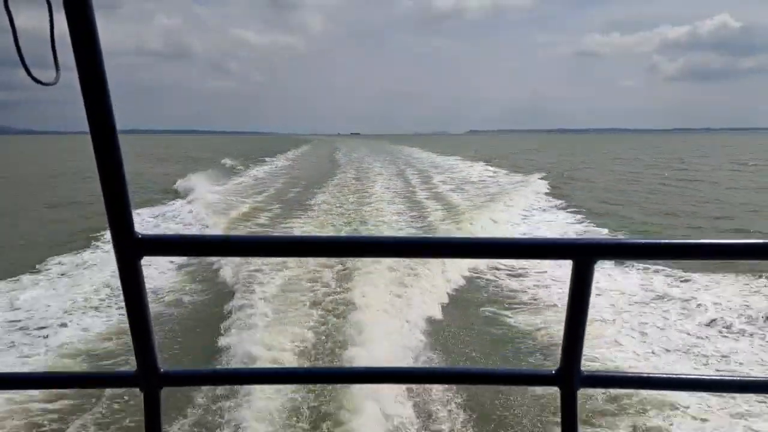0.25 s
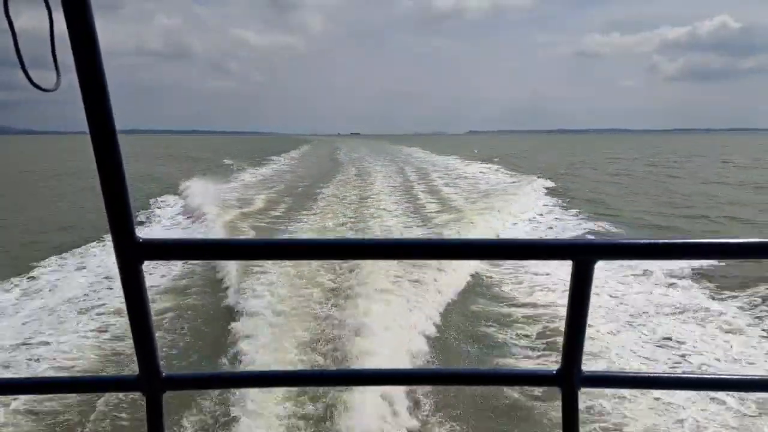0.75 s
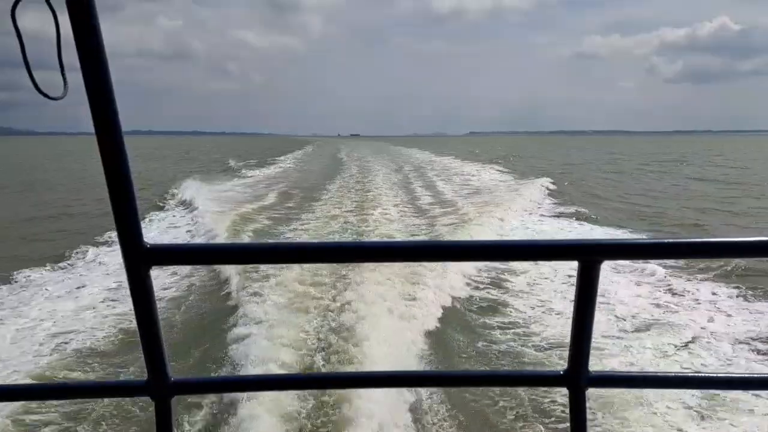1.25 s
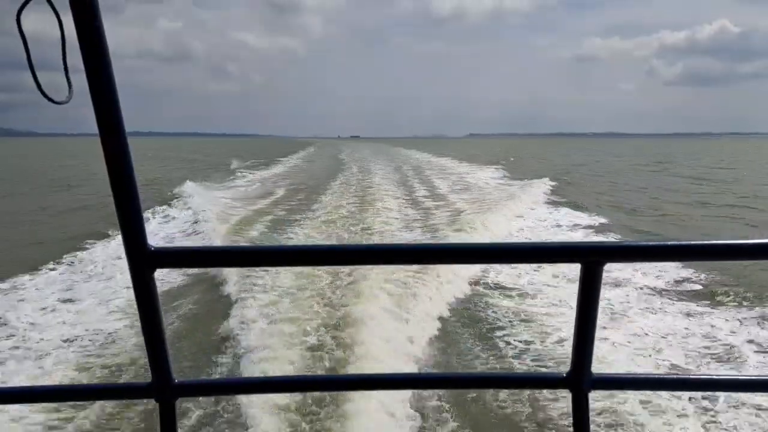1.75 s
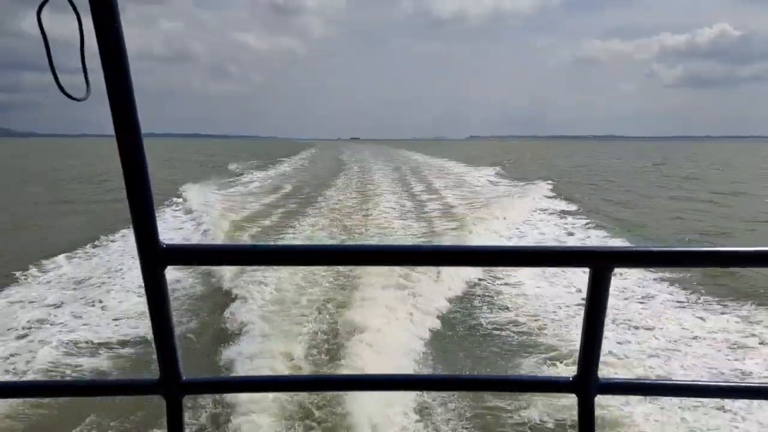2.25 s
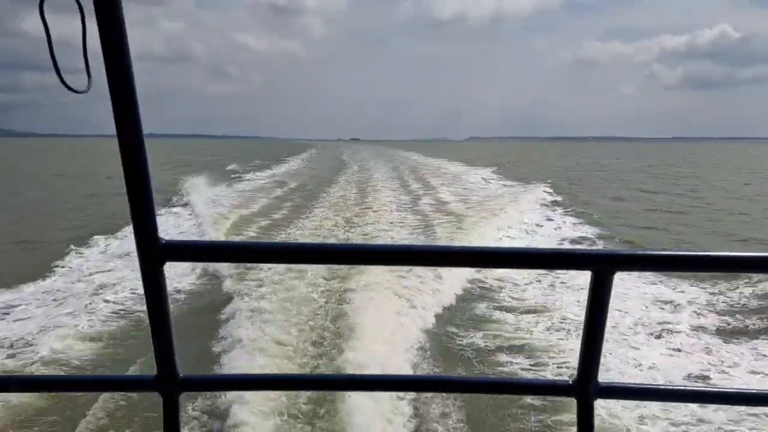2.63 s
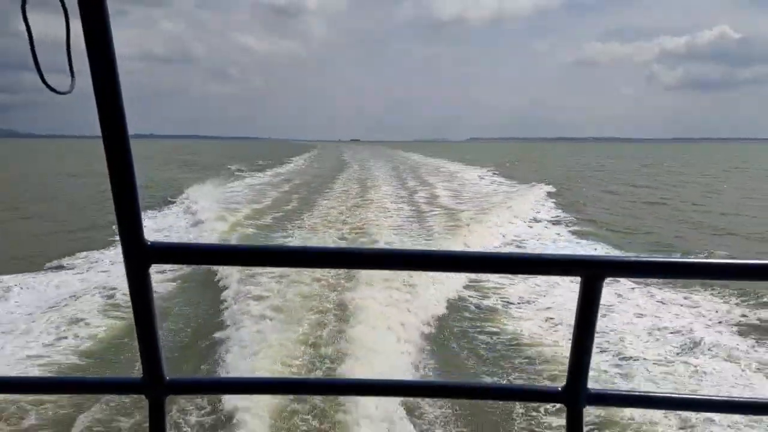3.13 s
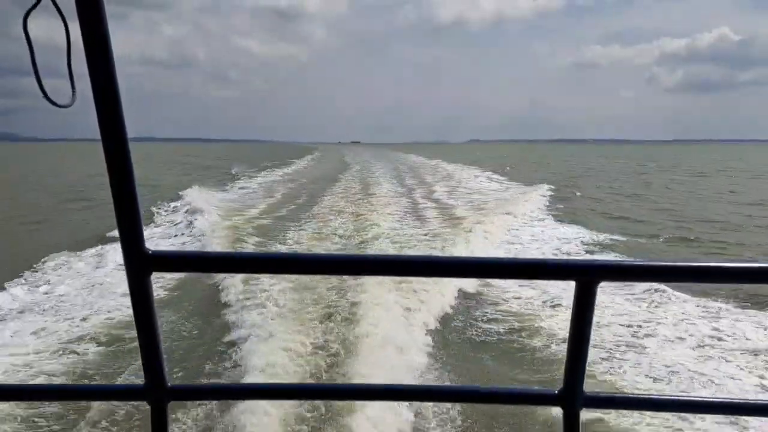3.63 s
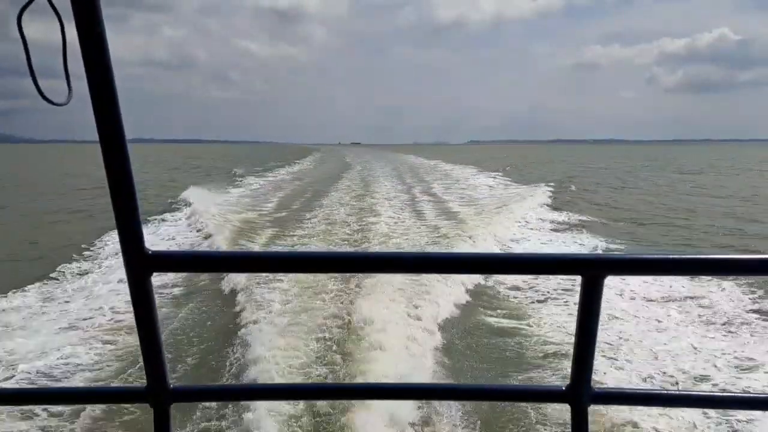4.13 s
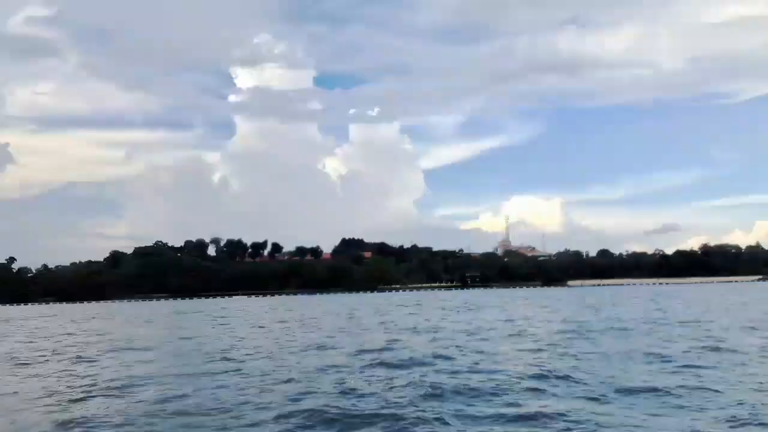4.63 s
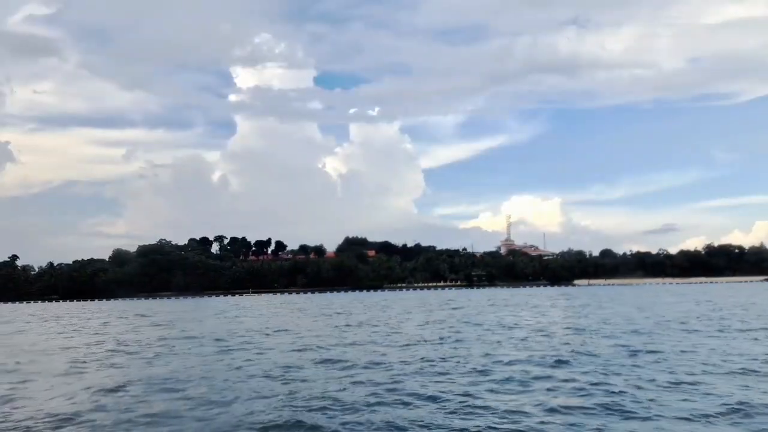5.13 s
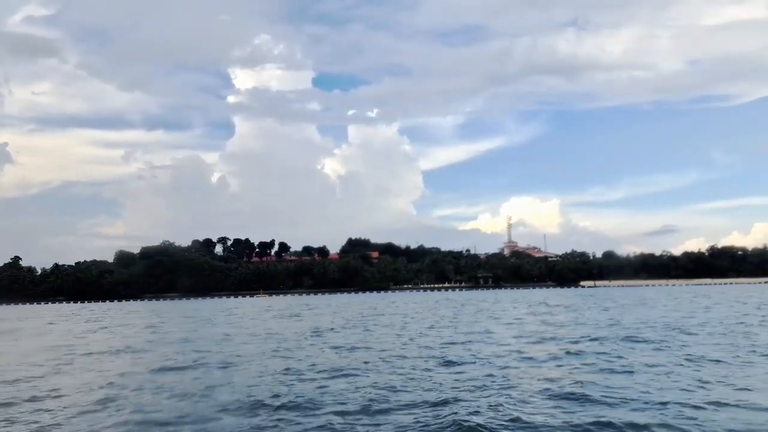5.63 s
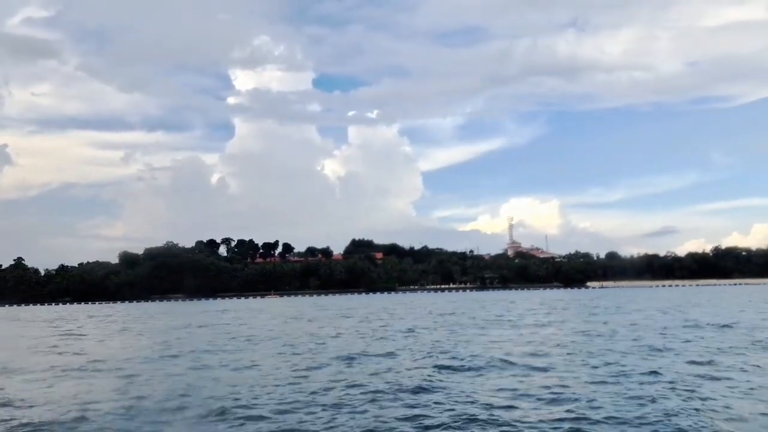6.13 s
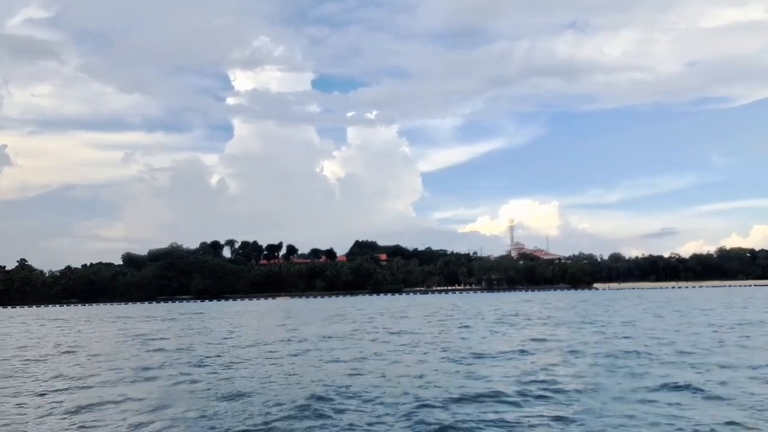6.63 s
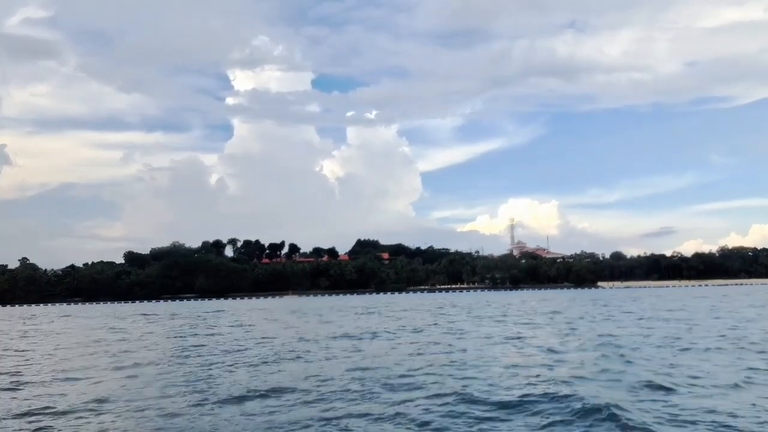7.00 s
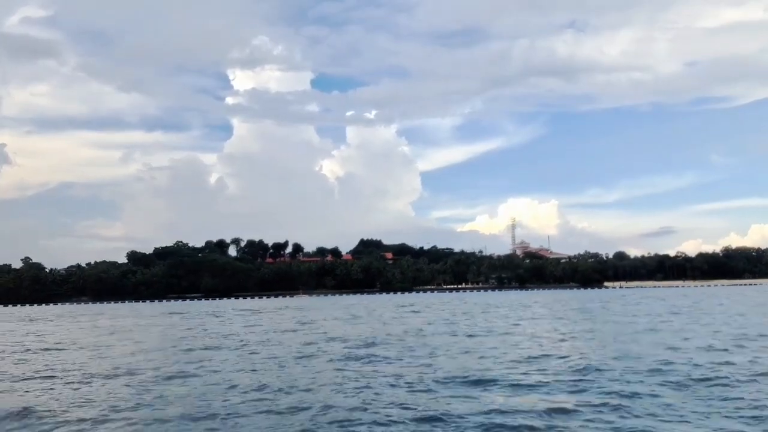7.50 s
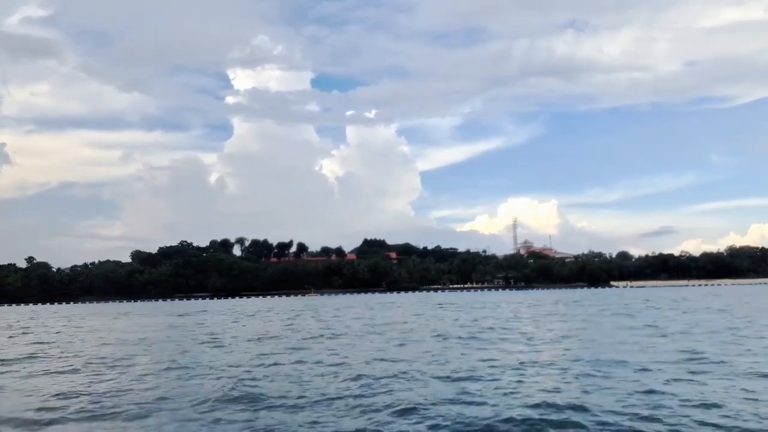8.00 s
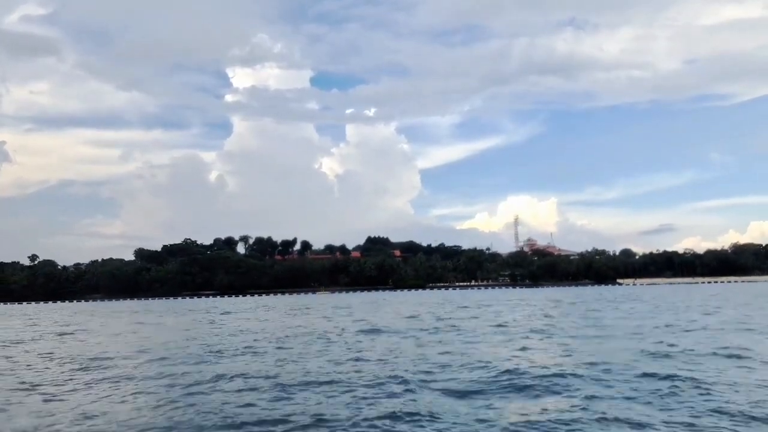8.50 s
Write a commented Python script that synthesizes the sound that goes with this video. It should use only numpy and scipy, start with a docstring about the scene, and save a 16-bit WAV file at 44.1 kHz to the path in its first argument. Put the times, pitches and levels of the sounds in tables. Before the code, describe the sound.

A loud, throbbing ferry engine drone with churning water cuts out briefly, followed by a slower low drone and soft splashes.

```python
"""First you hear the throbbing drone of a fast ferry at full speed, from the open deck at its stern.
Five diesels run at slightly different speeds, so their exhaust notes beat against each other over a
deep rumble, the roar of the wake and a faint turbocharger whistle. After a short silence comes a second
scene, along the side at slow speed: two diesels and a generator drone, gears whine, water washes past,
and small waves slap and fizz on the hull. Engines are sums of sine waves; water is shaped noise."""
import sys
import numpy as np
from scipy import signal
from scipy.fft import rfft, irfft, next_fast_len
from scipy.io import wavfile
from scipy.ndimage import uniform_filter1d, map_coordinates

SR = 44100
rng = np.random.default_rng(int(sys.argv[2]) if len(sys.argv) > 2 else 0)


def digitize_waveform(pressure):
    """Quantize a signal to 16-bit integers and store it at the path in sys.argv[1].

    Rows of a 2-D input are taken as channels; values are limited to [-1, 1].
    """
    field = np.atleast_2d(pressure).T
    bounded = np.clip(field, -1, 1)
    quanta = np.round(bounded * 32767).astype(np.int16)
    wavfile.write(sys.argv[1], SR, quanta)


N = 385875
TIME = np.arange(N) / SR
FAST_END_S, SLOW_START_S = 4.6013, 4.808  # silence lies between the two


def amp(db):
    """Turns decibels into a number to multiply by."""
    return 10 ** (np.asarray(db) / 20)

def curve_at(points, hz):
    """Joins (f/Hz, value) points with lines on a log frequency axis."""
    f, values = np.transpose(points)
    return np.interp(np.log(hz + 1), np.log(f + 1), values)

def wobble(t, rate):
    """A smooth curve through `rate` random values a second."""
    knots = rng.standard_normal(int(N / SR * 60))
    coarse = TIME[::64]
    return np.interp(t, coarse, map_coordinates(knots, [coarse * rate]))

def pulse(t, start, rise, hold, fall):
    """Climbs from 0 to 1, holds and falls back; times in seconds."""
    return np.interp(t - start, np.cumsum([0, rise, hold, fall]), [0, 1, 1, 0])


# How alike the noise is in both ears: f/Hz, likeness (1 = same, 0 = unrelated)
LIKENESS = [(60, .975), (250, .95), (500, .72), (800, .4), (1100, -.25), (1750, -.38), (2300, .3),
            (3200, 0), (15000, 0)]
# Which ear gets more noise, at the stern and at the side: f/Hz, left minus right/dB
STERN_BALANCE = [(60, 8), (99, 6), (160, 4.5), (270, -0.5), (450, -1), (740, -1.5), (1220, -3),
                 (2010, -6.5), (3330, -6), (5500, -14), (9080, -10.5), (15000, 2.5)]
SIDE_BALANCE = [(60, 11), (99, 2), (160, -2.5), (270, -1.5), (450, 4.5), (740, 1), (1220, -0.5),
                (2010, -6.0), (3330, -10.5), (5500, -7.5), (9080, 1), (15000, 0)]

def rush(t, spectrum, balance, band_hz, patchy_db):
    """Flickering stereo noise; the average of both ears has rms 1 inside band_hz."""
    cells = signal.stft(rng.standard_normal((2, len(t))), nperseg=512)[2]
    patches = uniform_filter1d(rng.standard_normal(cells.shape[1:]), size=8, axis=0)
    patches = uniform_filter1d(patches, size=10, axis=1)  # now smooth in pitch and time
    patches /= np.sqrt(np.mean(patches ** 2))
    noise = signal.istft(cells * amp(patchy_db * patches), nperseg=512)[1][:, :len(t)]
    size = next_fast_len(len(t))
    hz = np.fft.rfftfreq(size, 1 / SR)
    width = np.tan(np.arccos(curve_at(LIKENESS, hz)) / 2)
    shared, opposed = rfft(noise, size) * amp(curve_at(spectrum, hz))
    ears = np.array([shared + width * opposed, shared - width * opposed])
    ears *= amp(curve_at(balance, hz) * [[.5], [-.5]])
    band = ears.mean(axis=0)[(hz > band_hz[0]) & (hz < band_hz[1])]
    return irfft(ears, size)[:, :len(t)] * size / np.sqrt(2 * np.sum(np.abs(band) ** 2))


# When a thin sizzle comes and goes: middle t/s, half length/s, level/dB
SIZZLES = [(5.6, .06, -78), (7.48, .1, -76), (7.98, .11, -76)]
# Its tone colour: f/Hz, relative level/dB
SIZZLE_SPECTRUM = [(9500, -60), (10000, -6), (10250, 0), (10700, -6), (11200, -60)]

def sizzle(t):
    """A narrow hiss, high in the treble, appears in short spells."""
    spells = sum(amp(db) * np.exp(-((t - middle) / half) ** 4) for middle, half, db in SIZZLES)
    flicker = amp(2.5 * wobble(t, 40))
    return spells * flicker * rush(t, SIZZLE_SPECTRUM, SIDE_BALANCE, (9900, 10700), patchy_db=3)


# Small waves hitting the hull: start t/s, level/dB, time to fade by 60 dB/s
WAVES = [(4.93, -69.5, .5), (5.31, -72, .3), (5.89, -76, .2), (6.22, -73.5, .3), (6.43, -74, .2),
         (6.49, -73, .3), (6.96, -68.5, .6), (7.03, -70, .2), (7.17, -66, .15), (7.69, -76, .3),
         (7.95, -75, .3), (8.33, -66.5, .6), (8.615, -64, .2)]
# The tone colour of their fizz: f/Hz, relative level/dB
FIZZ_SPECTRUM = [(2500, -40), (4500, -10), (7000, -4), (9000, -1), (12000, 0), (14000, -3), (15700, -5)]

def small_waves(t):
    """Each wave breaks into bright fizz that rises quickly and dies away."""
    splashes = np.zeros(len(t))
    for start, db, fade_s in WAVES:
        age = np.maximum(t - start, 0)
        rise = 1 - np.exp(-age / (.03 * fade_s))
        splashes += rise * amp(db - 60 * age / fade_s)
    flicker = amp(3 * wobble(t, 40))
    return splashes * flicker * rush(t, FIZZ_SPECTRUM, SIDE_BALANCE, (11000, 15000), patchy_db=2.5)


# Turbocharger and gear tones: f/Hz, level/dB, pitch wander/Hz, left minus right/dB
TURBO_TONES = [(7895, -69, 10, -2)]
GEAR_TONES = [(462, -46, 5, -2), (710, -57, 4, 0), (740, -59, 4, 0), (775, -58, 4, 0), (984, -55.5, 5, -2),
              (1060, -64, 25, -2), (1270, -63, 25, -2), (1400, -66, 20, -2), (1550, -65, 9, -2),
              (4625, -77, 16, -4), (5185, -74.5, 8, -4)]

def whines(t, tones):
    """Spinning machinery sings tones that waver in pitch and level, differently in each ear."""
    out = np.zeros((2, len(t)))
    for hz, db, wander_hz, balance_db in tones:
        for ear, ear_db in enumerate((balance_db / 2, -balance_db / 2)):
            angle = 2 * np.pi * np.cumsum(hz + wander_hz * wobble(t, 20)) / SR
            out[ear] += 2 * amp(db + ear_db + 2 * wobble(t, 4)) * np.sin(angle)
    return out


# The tone colour of water along the hull: f/Hz, relative level/dB
WASH_SPECTRUM = [(300, -30.5), (450, -6), (600, -15), (750, -14), (870, -16.5), (1020, -19), (1150, -23.5),
                 (1300, -25), (2300, -27), (2800, -34), (3400, -39.5), (4000, -39.5), (5100, -35),
                 (5500, -40), (6500, -44), (8000, -42.5), (9300, -51), (11500, -51.5), (13000, -57.5),
                 (15700, -62.5)]

def wash(t, boost_db):
    """Water slides along the hull with a soft, fluttering hiss."""
    level_db = -52 + boost_db + 1.4 * wobble(t, 50)
    return amp(level_db) * rush(t, WASH_SPECTRUM, SIDE_BALANCE, (1090, 4000), patchy_db=1.1)


# The tone colour of the wake: f/Hz, relative level/dB
WAKE_SPECTRUM = [(200, -56), (450, -4), (600, -6), (950, -4), (1100, -9.5), (1540, -14), (2000, -13.5),
                 (2550, -11), (2850, -15.5), (4000, -18), (5800, -21.5), (8000, -26), (9400, -33),
                 (12200, -24), (14500, -33.5), (15700, -37.5)]

def wake(t, boost_db):
    """Churning water behind the ferry makes a broad roar."""
    level_db = -40.5 + boost_db + .5 * wobble(t, 14)
    return amp(level_db) * rush(t, WAKE_SPECTRUM, STERN_BALANCE, (1500, 7000), patchy_db=.72)


# The tone colour of the rumble at the stern: f/Hz, relative level/dB
STERN_RUMBLE = [(15, -43), (28, -29), (45, 3.5), (70, 0.5), (100, 1.5), (150, 0.5), (200, -7), (300, -6.5),
                (450, -12.5), (700, -23.5), (1200, -56), (2500, -120)]

def stern_rumble(t, boost_db):
    """The hull rumbles deeply and unevenly at full speed."""
    level_db = -30.5 + boost_db + .97 * wobble(t, 12)
    return amp(level_db) * rush(t, STERN_RUMBLE, STERN_BALANCE, (197, 424), patchy_db=1)


# The tone colour of the rumble at the side: f/Hz, relative level/dB
SIDE_RUMBLE = [(15, -46), (30, -12.5), (50, 6.5), (100, 9.5), (160, 8.5), (210, -6.5), (350, -4.5),
               (400, -14.5), (700, -21.5), (1200, -57), (2500, -120)]

def side_rumble(t, boost_db):
    """The hull rumbles more steadily at slow speed."""
    level_db = -35 + boost_db + .45 * wobble(t, 12)
    return amp(level_db) * rush(t, SIDE_RUMBLE, SIDE_BALANCE, (198, 450), patchy_db=1.5)


def diesel(t, cycles, notes, drift_cycles, flutter_db, strain=0):
    """Exhaust puffs make notes at multiples of the firing rate; strain weakens high ones most."""
    step = 8  # low notes only need every 8th sample
    coarse = t[::step]
    strain = np.broadcast_to(strain, t.shape)[::step]
    drift = drift_cycles * (wobble(coarse, 1.5) + .4 * wobble(coarse, 12))  # the crank turns unevenly
    right = 2 * np.pi * (cycles[::step] + drift)
    left = np.interp(coarse - 8 / SR, coarse, right)  # the drone arrives 8 samples later
    out = np.zeros((2, len(coarse)))
    for multiple, db, balance_db in notes:
        level_db = db + flutter_db * wobble(coarse, 4) - 1.6 * strain * min(multiple, 7)
        pipe_phase = .35 * multiple ** 2  # the pipe delays each note by its own amount
        note = np.sqrt(2) * np.cos(multiple * np.array([left, right]) + pipe_phase)
        out += amp([[balance_db / 2], [-balance_db / 2]]) * amp(level_db) * note
    return signal.resample_poly(out, step, 1, axis=1, padtype="line")[:, :len(t)]


# The generator's notes: multiple of the firing rate, level/dB, left minus right/dB
GENERATOR_NOTES = [(2, -23, 1), (3, -20.5, 1), (4, -42, 3), (5, -41, -2), (6, -35.5, 3), (7, -35.5, -7),
                   (8, -52, 2), (10, -50, 5), (13, -53, 8), (19, -61, 1)]

def generator(t):
    """A small diesel hums; a brief load slows it a little and dulls its sound."""
    firing_hz, sag_hz = 52.04, .96
    load = pulse(t, start=6.92, rise=.15, hold=.256, fall=.46)
    cycles = .4 + np.cumsum(firing_hz - sag_hz * load) / SR
    return diesel(t, cycles, GENERATOR_NOTES, drift_cycles=.02, flutter_db=1.4, strain=load)


# Exhaust notes, one table an engine: multiple of the firing rate, level/dB, left minus right/dB
FAST_A = [(3, -33, 1), (6, -21, 0), (8, -39, 2), (9, -29, 3), (11, -35, 3), (14, -44, 0), (15, -46, 3),
          (17, -44, 0), (18, -43, -1), (28, -46, -2)]
FAST_B = [(2, -43, 2), (3, -31, 1), (4, -38, 1), (5, -36, 2), (6, -32, 1), (7, -31, 1)]
FAST_C = [(2, -43, 2), (4, -34, 1), (5, -32, 2), (9, -36, 1), (10, -36, 1), (11, -39, 2), (12, -40, 3)]
FAST_D = [(6, -21.5, 0), (7, -35, 0), (9, -23, 1), (10, -38, 1), (11, -38, 1), (12, -43, 3), (13, -46, 2),
          (15, -46, 1)]
FAST_E = [(3, -28, 1), (4, -36, 1), (5, -39, 1), (6, -26, -2), (8, -35, 3), (9, -25, 1), (12, -44, 2),
          (18, -45, 1)]
SLOW_A = [(4, -39, 0), (5, -40, 2), (6, -18, 2), (9, -26.5, 1), (10, -33, 1), (12, -26.5, 1), (13, -37, 3),
          (14, -28.5, 1), (16, -35, 1), (17, -41, 3), (18, -35, 0), (19, -42, 1), (20, -47, 1),
          (21, -44, 2)]
SLOW_B = [(3, -34, 1), (6, -23, 1), (7, -38, 1), (9, -27, 2), (11, -37, -1), (17, -46, 3), (21, -46, -3),
          (24, -49, -6), (28, -48, 0)]
# Each engine's firing rate (full cycles a second): f/Hz
FAST_RATES = [13.588, 15.13, 15.265, 15.365, 15.5]
SLOW_RATES = [10.82, 12.267]
# A moment when each engine fires its first cylinder: t/s
FAST_FIRINGS = [2.12, 2.1448, 2.11, 2.11, 2.1313]
SLOW_FIRINGS = [6.3, 6.3259]

def main_engines(t, tables, rates, firings, flutter_db):
    """Diesels at slightly different speeds slip in and out of step, so their sum throbs."""
    return sum(diesel(t, hz * (t - fired), notes, drift_cycles=.003, flutter_db=flutter_db)
               for notes, hz, fired in zip(tables, rates, firings))


# Surges of churning water: middle t/s, half length/s, rumble change/dB, wake change/dB
WATER_SURGES = [(.5, 0.18, -2, 0.83), (1.95, 0.65, 1.5, 1.4), (3.3, 0.33, 3, 0.84)]

def full_speed(t):
    """At the stern: five engines, rumble and wake shift in level as the water surges."""
    surge_db, froth_db = sum(np.outer(changes, np.exp(-((t - middle) / half) ** 2))
                             for middle, half, *changes in WATER_SURGES)
    tables = FAST_A, FAST_B, FAST_C, FAST_D, FAST_E
    exhaust = main_engines(t, tables, FAST_RATES, FAST_FIRINGS, flutter_db=.9)
    weak_start_db = -.5 * np.clip(1 - t, 0, 1)
    exhaust *= amp(weak_start_db + .46 * surge_db)  # swings less than the rumble
    return exhaust + whines(t, TURBO_TONES) + stern_rumble(t, surge_db) + wake(t, froth_db)

def slow_speed(t):
    """At the side: machines, rumble and wash swell briefly, then small waves break."""
    swell = pulse(t, start=4.785, rise=.11, hold=.1, fall=.2)
    creep_db = .51 * (t - SLOW_START_S)  # rumble and wash slowly grow louder
    exhaust = main_engines(t, (SLOW_A, SLOW_B), SLOW_RATES, SLOW_FIRINGS, flutter_db=.8)
    drone = exhaust + generator(t)
    background = side_rumble(t, creep_db + 5 * swell) + wash(t, creep_db + 5.5 * swell)
    machines = amp(5 * swell) * (drone + whines(t, GEAR_TONES))
    return background + machines + small_waves(t) + sizzle(t)

def scene():
    """Full speed stops abruptly; after a silence, slow speed fades in quickly."""
    out = np.zeros((2, N))
    fast, slow = TIME < FAST_END_S, TIME > SLOW_START_S
    fade_out = np.clip((FAST_END_S - TIME[fast]) / .0003, 0, 1)
    fade_in = np.clip((TIME[slow] - SLOW_START_S) / .016, 0, 1) ** 1.3
    out[:, fast] = full_speed(TIME[fast]) * fade_out
    out[:, slow] = slow_speed(TIME[slow]) * fade_in
    return out

def record(dry):
    """Gently squeezes the loudest peaks and removes the very highest treble."""
    ceiling, top_hz, pad = .98, 15720, 2048
    squeezed = dry / (1 + np.abs(dry / ceiling) ** 6) ** (1 / 6)
    padded = np.pad(squeezed, [(0, 0), (pad, pad)], "reflect")
    size = next_fast_len(padded.shape[1] + 8192)
    low_pass = np.clip((top_hz - np.fft.rfftfreq(size, 1 / SR)) / 30, 0, 1)
    return irfft(rfft(padded, size) * low_pass, size)[:, pad:pad + N]


dry = scene()
out = record(dry)
digitize_waveform(out)
```